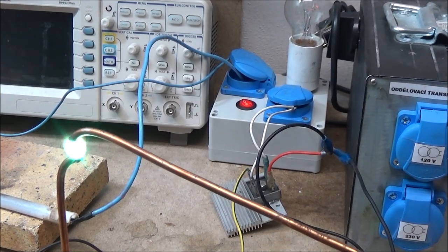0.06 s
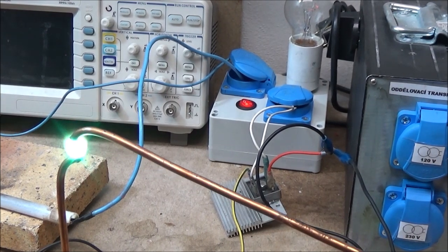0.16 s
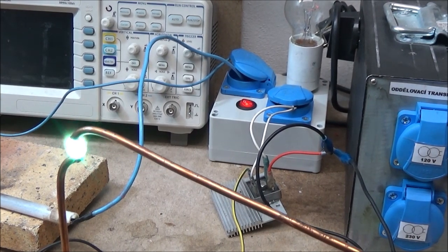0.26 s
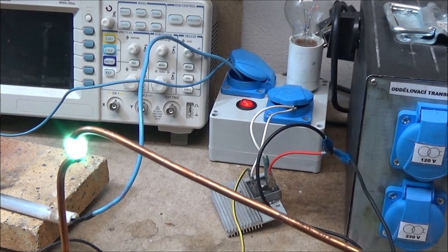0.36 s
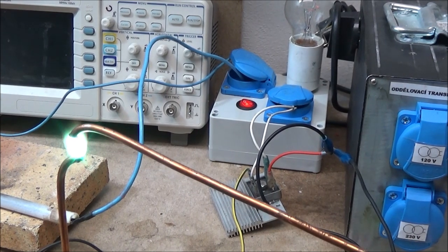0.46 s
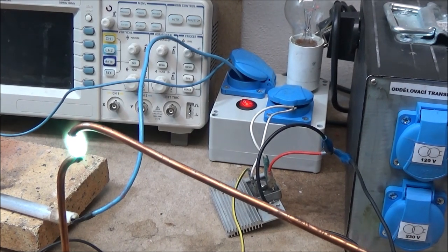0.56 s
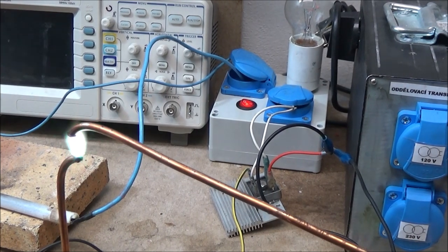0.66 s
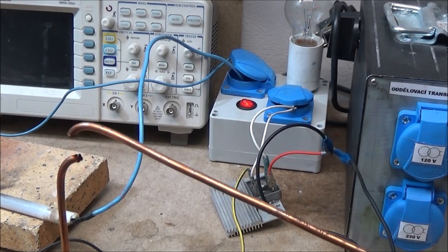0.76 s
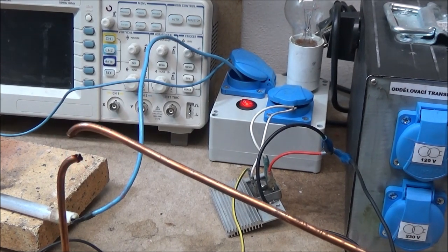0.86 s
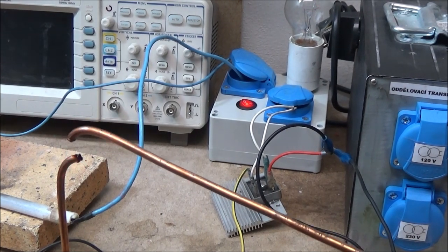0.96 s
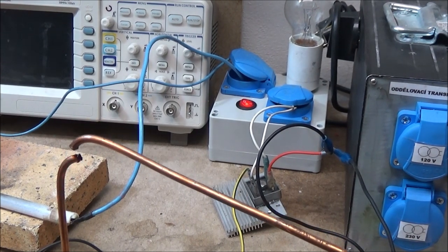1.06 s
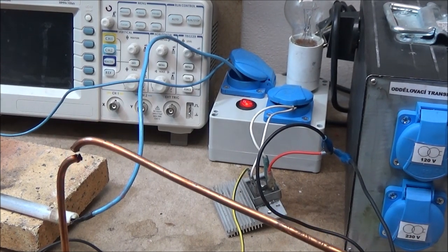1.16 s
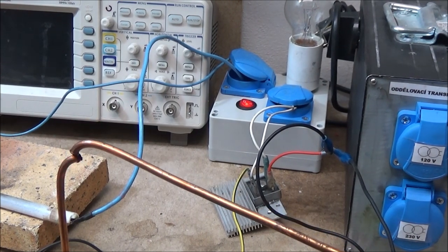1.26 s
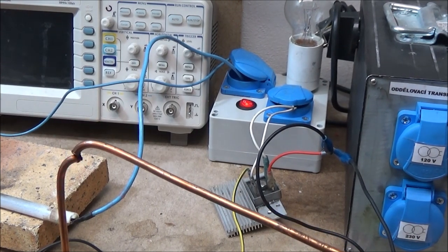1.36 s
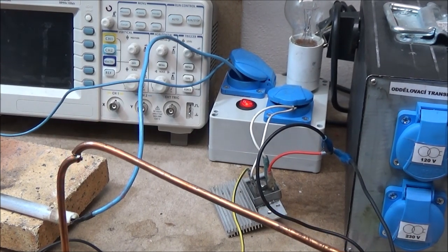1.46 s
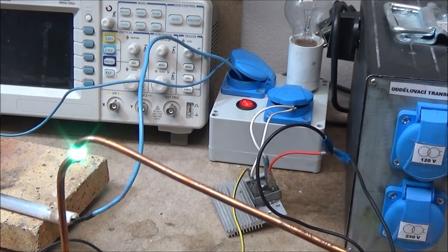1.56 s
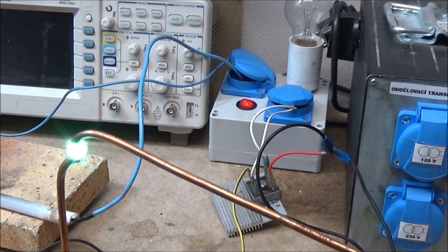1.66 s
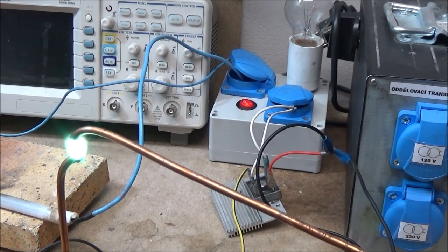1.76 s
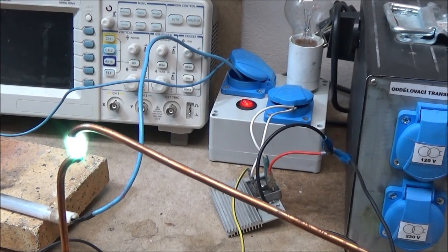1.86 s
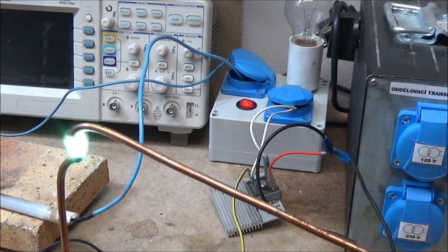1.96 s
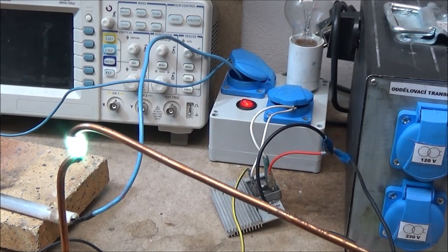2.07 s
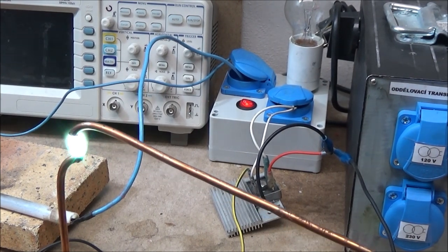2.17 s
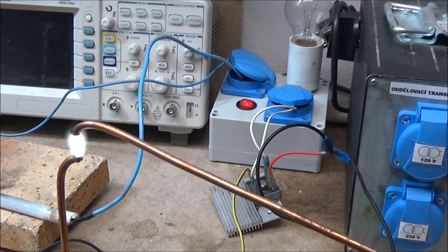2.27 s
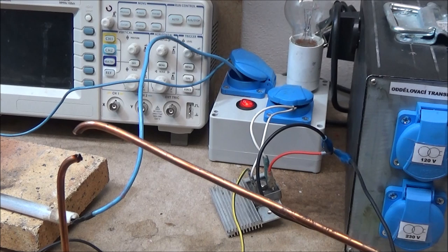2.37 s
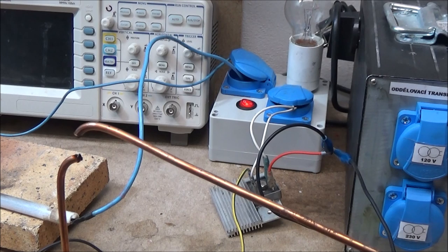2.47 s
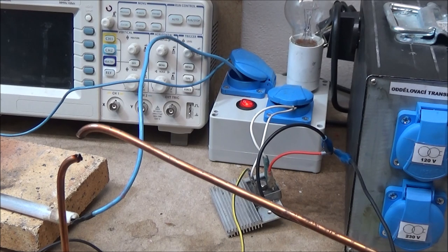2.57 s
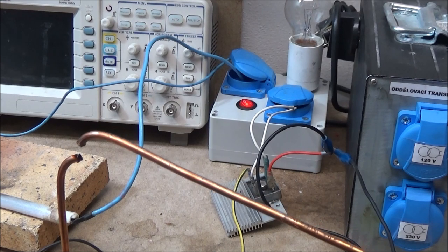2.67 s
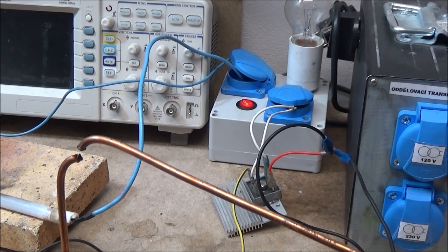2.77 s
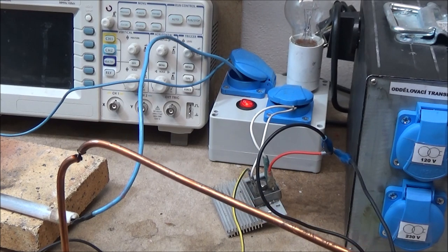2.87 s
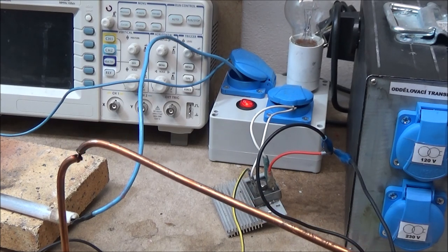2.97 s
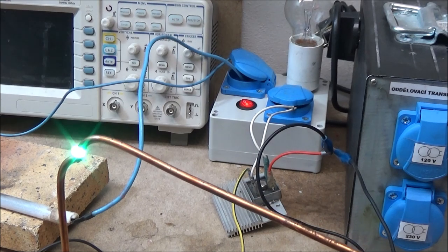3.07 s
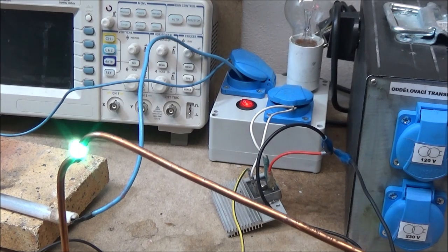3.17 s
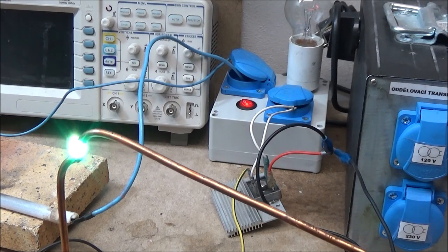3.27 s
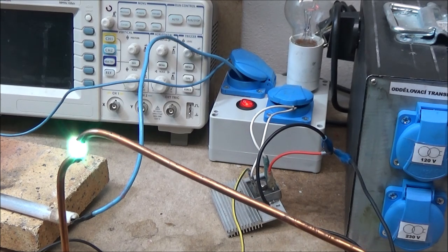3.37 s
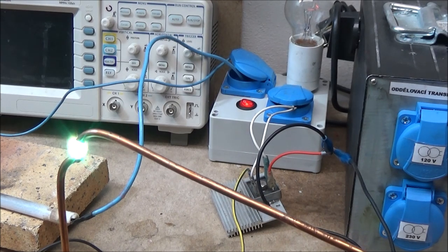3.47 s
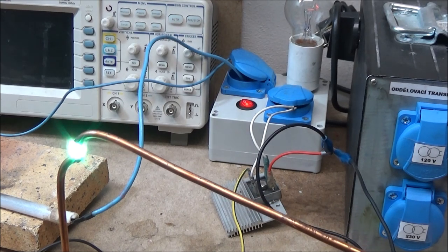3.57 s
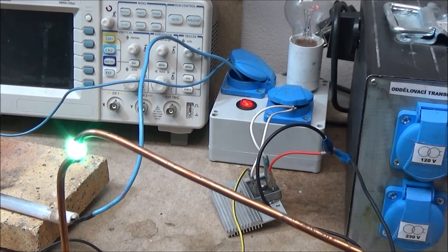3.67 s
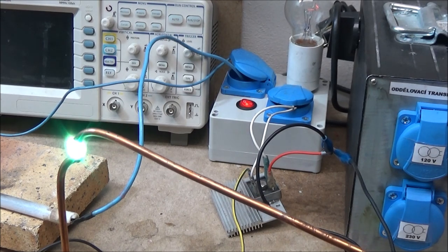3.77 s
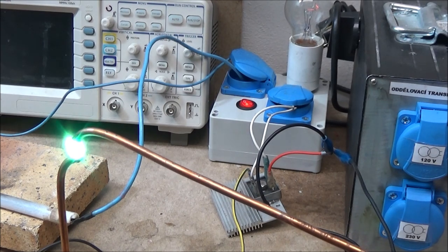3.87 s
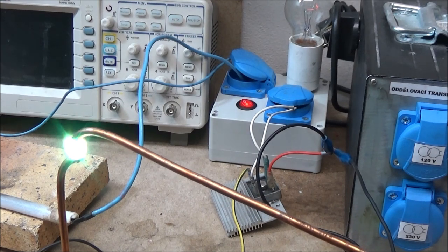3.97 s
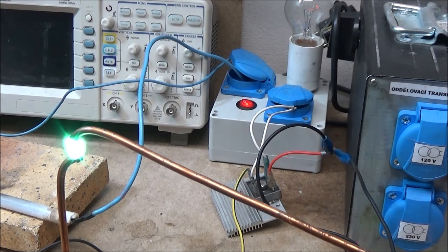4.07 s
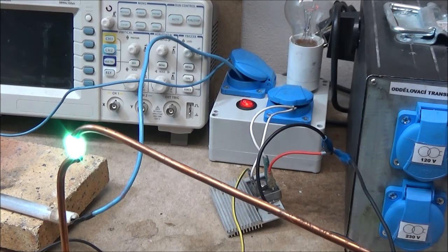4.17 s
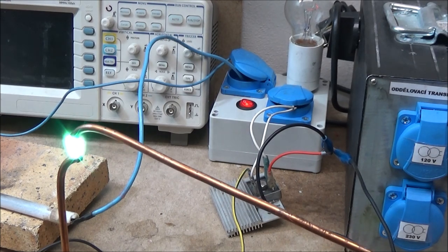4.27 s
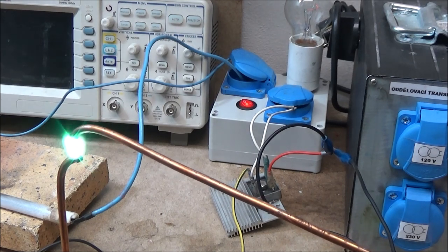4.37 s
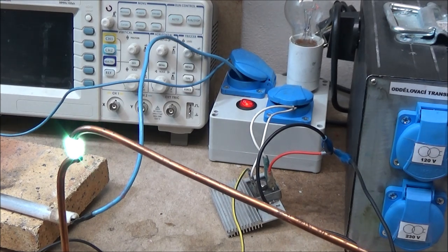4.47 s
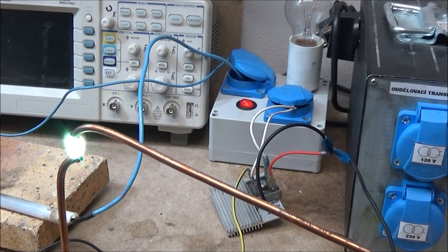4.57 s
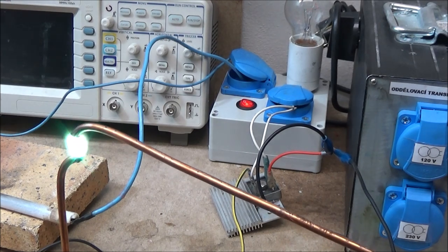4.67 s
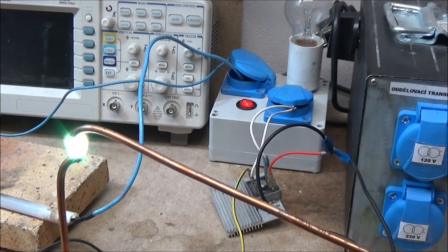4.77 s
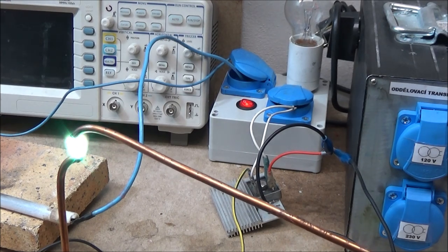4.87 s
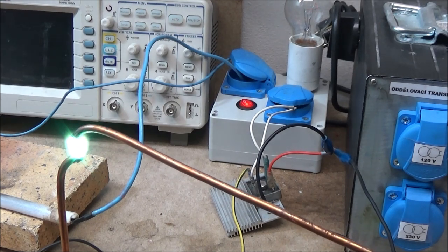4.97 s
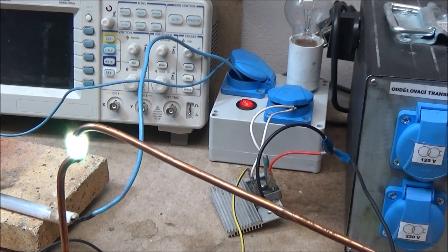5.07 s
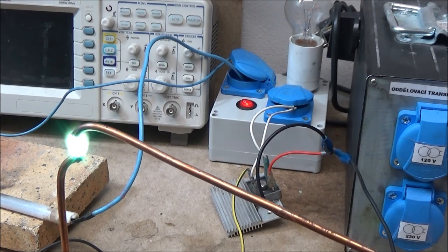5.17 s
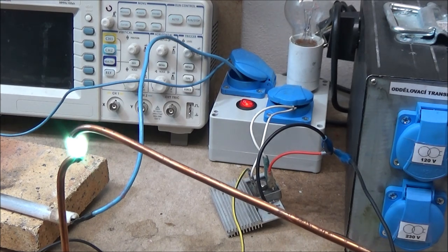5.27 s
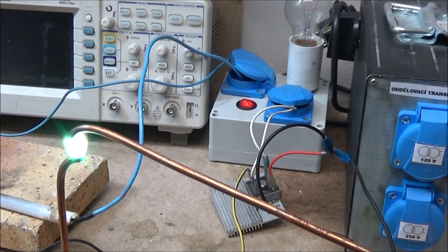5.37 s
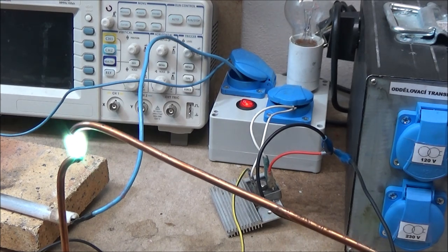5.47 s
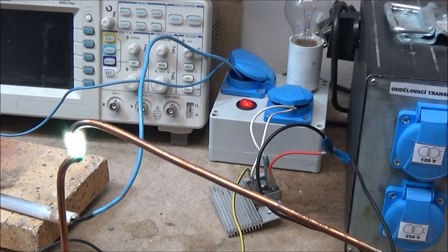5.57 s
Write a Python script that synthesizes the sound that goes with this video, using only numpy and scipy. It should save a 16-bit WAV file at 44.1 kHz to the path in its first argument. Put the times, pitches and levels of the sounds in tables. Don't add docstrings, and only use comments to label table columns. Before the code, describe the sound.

In a quiet workshop, a close stereo microphone pair hears an electric arc, slightly left, already burning: a harsh, bright, dense sizzle, roughened by a rapid mains-rate flutter, above a faint low transformer hum. Sharp snaps precede a sudden cutoff with a small pop at 0.73 s. The hum dies quickly, leaving soft air hiss and faint, quick camera-motor ticks, with a dull bump near 1.2. At 1.4 copper tubes clack and chatter; the sizzle catches unevenly, thin and bright at first, fuller by about 1.6, then breaks with a pop at 2.33. After another hush, brisk knocks from 2.9 to 3.0 strike it again; it catches, falters, and catches fully. This last burst runs on to the end at about 5.6, with brief flickers, a loud snap near 4.0, a weaker, more crackly sag from about 4.1 to 4.6, then recovery with scattered sharp snaps. Reflections are short and close.

```python
import sys
import numpy as np
from scipy import signal
from scipy.fft import rfft, irfft, next_fast_len
from scipy.io import wavfile
from scipy.ndimage import uniform_filter1d

SR = 44100
rng = np.random.default_rng(int(sys.argv[2]) if len(sys.argv) > 2 else 0)


def inscribe(sig):
    pcm = np.round(np.clip(np.atleast_2d(sig).T, -1, 1) * 32767)
    wavfile.write(sys.argv[1], SR, pcm.astype(np.int16))


def voltage_ratio(level):
    return 10 ** (np.asarray(level, float) / 20)


N = 247401
TIME = np.arange(N) / SR
MAINS_HZ = 50
MAINS_TURN = 2 * np.pi * MAINS_HZ * TIME
PAD = next_fast_len(N + SR)
HZ = np.maximum(np.arange(PAD // 2 + 1) * SR / PAD, 1)


def rms_one(x):
    return x / np.sqrt(np.mean(x ** 2) + 1e-20)


def in_time(rows):
    s, *columns = np.transpose(rows)
    return [np.interp(TIME, s, column) for column in columns]


def at_hz(points):
    hz, values = np.array(points)[:, 0], np.array(points)[:, 1]
    return np.interp(np.log(HZ), np.log(hz), values)


def shaped(x, response):
    return irfft(rfft(x, PAD) * response, PAD)[..., :N]


def butter(x, hz, kind, order=2):
    return signal.sosfilt(signal.butter(order, hz, kind, fs=SR, output="sos"), x)


def drift(rate_hz):
    r = np.exp(-2 * np.pi * rate_hz / SR)
    noise = rng.standard_normal(N + SR)
    return rms_one(signal.lfilter([1], [1, -2 * r, r * r], noise)[SR:])


def clicks(times, gains):
    out = np.zeros(N)
    places = np.round(np.asarray(times) * SR).astype(int)
    np.add.at(out, np.clip(places, 0, N - 1), gains)
    return out


def ring(x, hz, t60):
    r, w = np.exp(-np.log(1000) / (t60 * SR)), 2 * np.pi * hz / SR
    return signal.lfilter([0, np.sin(w)], [1, -2 * r * np.cos(w), r * r], x + 1e-18)


def step(s, width_s):
    return .5 + .5 * np.tanh((TIME - s) / width_s)


# from in seconds, to in seconds.
BURNS = [
    (-1, .7295),
    (1.452, 2.3262),
    (2.936, 9),
]
# time in seconds, strength in dB.
STRIKES = [
    [(1.45, -65), (1.458, -50), (1.518, -41.5), (1.542, -26.5), (1.56, -29), (1.572, -29), (1.6, -32.5)],
    [(2.93, -62), (2.953, -33), (2.964, -33.5), (2.978, -38.5), (2.985, -53), (3.007, -72), (3.017, -32),
     (3.06, -29.5), (3.08, -30.5)],
]
# time in seconds, strength in dB.
HOLDS = [
    [(0, -31.5), (.5, -30.5), (.72, -32), (.73, -40)],
    [(1.8, -32), (2.18, -30.5), (2.316, -33), (2.326, -42)],
    [(3.5, -29.5), (3.98, -30.5), (4.03, -33.5), (4.26, -38), (4.54, -37.5), (4.64, -31.5), (4.74, -31),
     (5.61, -31)],
]
# time in seconds, change in dB, half length in seconds, thinning in dB.
JUMPS = [
    (0.09, 3, 0.016, 4),
    (1.819, 5, 0.014, 3),
    (3.336, -2.5, 0.011, -2),
    (3.356, -2.5, 0.023, 9),
    (3.465, 1.5, 0.024, 1),
    (4.547, -3.5, 0.0085, -11),
    (4.586, -6, 0.041, -1),
    (5.565, -3.5, 0.02, -1),
]
# drawn out at in seconds, loss of body in dB, extra top in dB.
YOUNG = [
    (1.566, -12, 9),
    (3.03, -9, 8),
]
BODY_DB, TOP_DB = 1.5, -4
DRAW_OUT_S, TOP_SETTLES_S = .006, .039


def arc_controls():
    held_db, = in_time(sorted(row for span in STRIKES + HOLDS for row in span))
    jump_db, thin_db = np.zeros(N), np.zeros(N)
    for s, change_db, half_s, thinning_db in JUMPS:
        bump = np.clip(1 - abs(TIME - s) / half_s, 0, 1)
        jump_db += change_db * bump
        thin_db += thinning_db * bump
    body_db = BODY_DB - thin_db + .8 * drift(9.7)
    top_db = TOP_DB + thin_db + .5 * drift(4.8)
    for (lit_s, _), (drawn_s, loss_db, extra_db) in zip(BURNS[1:], YOUNG):
        struck = TIME > lit_s - .1
        body_db += loss_db * struck * (1 - step(drawn_s, DRAW_OUT_S))
        top_db += extra_db * struck * (1 - step(drawn_s, TOP_SETTLES_S))
    return held_db + jump_db, body_db, top_db


# frequency in Hz, density in dB per Hz.
SIZZLE = [(50, -42), (150, -26.5), (280, -19), (400, -12.5), (500, -19), (700, -15.5), (1100, -17),
          (2000, -9), (3500, -7), (5000, -1.3), (6500, -2.5), (8000, -1), (10500, 0.13), (13000, -9),
          (15600, -15)]
# centre in Hz, width in Hz, boost in dB.
CASINGS = [(1260, 210, 4.5), (1830, 22, 8), (2140, 36, 4), (3280, 32, -2), (3414, 38, 4), (9030, 220, 2)]


def sizzle():
    level_db, body_db, top_db = arc_controls()
    sizes = voltage_ratio(3.23 * np.minimum(rng.exponential(1, N), 5)) * rng.choice([-1, 1], N)
    discharges = sizes * (rng.random(N) < 9000 / SR)
    hiss = 1.09 * voltage_ratio(0.29 * np.clip(level_db + 28.5, -9, 3))
    sparks = discharges + hiss * rng.standard_normal(N)
    flicker_db = .8 * np.cos(2 * MAINS_TURN - 2.1) + 0.48 * drift(47) + 1.8 * drift(410)

    colour_db = at_hz(SIZZLE)
    for hz, width, boost_db in CASINGS:
        colour_db = colour_db + boost_db / (1 + (2 * (HZ - hz) / width) ** 2)
    below_2700 = 1 / (1 + (HZ / 2700) ** 6)
    below_5000 = 1 / (1 + (HZ / 5000) ** 6)
    above_11500 = 1 / (1 + (11500 / HZ) ** 12)
    ranges = np.array([below_2700, below_5000 - below_2700, 1 - below_5000 - above_11500, above_11500])
    bands = shaped(sparks * voltage_ratio(flicker_db), voltage_ratio(colour_db) * ranges)
    low, lower_middle, middle, top = rms_one(bands) / np.sqrt(3.6)
    raw = middle + voltage_ratio(0.41 * (body_db - BODY_DB)) * lower_middle + voltage_ratio(body_db) * low + voltage_ratio(top_db) * top

    lit = sum((TIME > a) & (TIME < b) for a, b in BURNS)
    gate = uniform_filter1d(lit * 1., size=40)
    return voltage_ratio(level_db - 1.74 - 0.16 * np.clip(level_db + 33.5, -9, 3)) * gate * raw


# time in seconds, peak in dB.
SNAPS = [(.0258, -70), (.6494, -24), (.6914, -8), (.6936, -18), (.7158, -23), (1.5425, -17), (1.55, -20),
         (3.0408, -10), (3.0465, -12), (3.9862, -6), (4.354, -24), (4.426, -18), (4.485, -17), (4.536, -19),
         (4.545, -21), (4.554, -12.5), (4.608, -17), (4.657, -12), (4.6954, -15), (4.9217, -11),
         (5.2739, -9), (5.442, -8), (5.4879, -24)]


def snaps():
    s, db = np.transpose(SNAPS)
    pulses = signal.lfilter([1, -1], [1, -.4, .3], clicks(s, voltage_ratio(db + 4)))
    return butter(pulses, 9300, "low", order=3)


# time in seconds, peak in dB.
POPS = [
    (0.73, -24.5),
    (2.3261, -25),
]


def pops():
    s, db = np.transpose(POPS)
    suction = -ring(clicks(s - .0003, voltage_ratio(db)), 1000, 0.0022)
    rebound = ring(clicks(s, voltage_ratio(db - 17.5)), 190, 0.018) + ring(clicks(s, voltage_ratio(db - 9)), 290, 0.012)
    return butter(suction + rebound, 90, "high")


# delay in milliseconds, signed reflection as a ratio.
ECHOES = [(0.323, 0.052), (0.395, -0.055), (0.577, -0.116), (0.601, 0.092), (0.701, 0.119), (0.747, -0.093),
          (0.902, 0.319), (1.033, 0.065), (1.12, -0.077), (1.143, 0.11), (1.362, -0.079), (1.685, 0.048),
          (1.723, 0.057), (1.801, 0.04), (2.004, 0.043), (2.199, -0.097), (2.214, 0.134), (2.288, -0.081),
          (2.436, -0.035), (2.495, -0.044), (2.65, -0.065), (2.71, 0.097), (2.796, -0.084), (2.862, 0.053),
          (2.947, -0.036), (3.101, -0.044), (3.17, 0.064), (3.572, -0.033), (4.76, -0.036), (5.662, -0.031)]


def bench_top(x):
    echoes = sum(g * np.exp(-2j * np.pi * HZ * ms / 1000) for ms, g in ECHOES)
    return shaped(x, 1 + 1.16 * echoes)


HUM_DB, HUM_IDLE_DB = -62.5, -84
OVERTONE_DB, OVERTONE_IDLE_DB = -70.5, -82
HUM_LIT_S, HUM_LEAD_S = -.45, .06
HUM_SWELL_S, HUM_DIES_S = .2, .039


def hum():
    load = 0
    starts = [HUM_LIT_S] + [row[0] - HUM_LEAD_S for row in YOUNG]
    for start_s, (_, out_s) in zip(starts, BURNS):
        swell = 1 - np.exp(-np.clip(TIME - start_s, 0, None) / HUM_SWELL_S)
        load = load + swell * np.exp(-np.clip(TIME - out_s, 0, None) / HUM_DIES_S)
    first = (voltage_ratio(HUM_IDLE_DB) + voltage_ratio(HUM_DB) * load ** 1.5) * voltage_ratio(1.3 * drift(5.0))
    second = (voltage_ratio(OVERTONE_IDLE_DB) + voltage_ratio(OVERTONE_DB) * load ** 0.58) * voltage_ratio(1.45 * drift(12))
    return np.sqrt(2) * (first * np.sin(2 * MAINS_TURN) + second * np.sin(4 * MAINS_TURN))


# frequency in Hz, level in dB, t60 in seconds, lag in seconds,
# change on a weak step in dB.
TICK = [(2660, -49, 0.011, 0.0009, -5), (2860, -50, 0.0083, .0008, -15), (3300, -56, 0.027, 0.0025, 0.5)]
TICK_FIRST_S, TICK_PERIOD_S = .0274, .04
TICK_LEAN_DB = 2.5


def camera_motor():
    s = np.arange(TICK_FIRST_S, N / SR, TICK_PERIOD_S)
    weak = np.arange(len(s)) % 2 == 0
    ticks = np.zeros(N)
    for hz, db, t60, lag_s, weak_db in TICK:
        chance_db = 1.2 * rng.normal(0, 1, len(s))
        ticks += ring(clicks(s + lag_s, voltage_ratio(db + weak * weak_db + chance_db)), hz, t60)
    return ticks * voltage_ratio(np.array([[TICK_LEAN_DB], [-TICK_LEAN_DB]]))


# time in seconds,
# level in dB, frequency in Hz, t60 in seconds.
THUMPS = [
    (0, -56, 57.3, 0.47),
    (0, -55, 123, 0.21),
    (1.161, -57.5, 254, 0.17),
    (1.455, -54, 120, 0.13),
    (2.976, -57.5, 120, .15),
]


def thumps():
    out = np.zeros(N)
    for s, db, hz, t60 in THUMPS:
        out += ring(ring(clicks([s], voltage_ratio(db)), hz, t60), hz, 0.09) * 500 / SR
    return out


# frequency in Hz, density in dB per Hz.
FLOOR = [(15, -32.5), (30, 0), (60, -0.5), (133, 2.5), (250, 1), (600, 0), (1000, -3), (1800, -5.5),
         (3600, -9.5), (8000, -14), (14700, -17), (16000, -19)]
# frequency in Hz, likeness from 0 to 1.
FLOOR_LIKENESS = [(70, 1), (180, 0.77), (550, 0.073), (1650, 0.044), (4970, 0.58), (10000, 0.99)]


def floor():
    alike = np.clip(at_hz(FLOOR_LIKENESS), 0, 1)
    noise = rng.standard_normal((2, N))
    mid, side = shaped(noise, voltage_ratio(at_hz(FLOOR)) * np.sqrt([1 + alike, 1 - alike]))
    return voltage_ratio(-57.25) * rms_one(np.array([mid + side, mid - side]))


# time in seconds, blow in dB, ring of the tip in relative dB, contact cutoff in Hz,
# tilt of the modes in dB per octave.
KNOCKS = [(1.412, -36.5, 5.5, 6000, 5), (1.418, -41.5, -4, 2000, -2), (1.456, -41, 2, 1500, -4.5),
          (1.465, -42, -9, 1400, -1), (1.486, -48, -19, 600, -6), (2.908, -38.5, 4.5, 6000, 6),
          (2.916, -38, 0, 2000, 3), (2.939, -37, -19, 1500, -3), (2.97, -44.5, -6, 2500, 12),
          (2.978, -40.5, 6.5, 2500, -1), (2.989, -41, -6, 2000, -6), (3.007, -46, -3, 1200, -5.5)]
# frequency in Hz, level in dB, t60 in seconds.
TUBE = [(273, -10, 0.13), (383, -13, 0.049), (566, -2.5, 0.061), (690, -7, 0.035), (860, -2.5, 0.037),
        (952, -0.5, 0.038), (1120, -2, 0.019), (1330, -11.5, 0.03), (1470, -16.5, 0.038),
        (1690, -7.5, 0.05), (1880, -10, .03), (2400, -26, .03)]
# frequency in Hz, level in dB, t60 in seconds.
TIP = [(2980, -2.5, 0.024), (3300, -16, 0.03), (5730, -16, .025), (5830, -16, 0.025), (6900, -20, .018)]


def knocks():
    out, t = np.zeros(N), TIME[:SR // 2]
    for s, db, tip_db, cut_hz, tilt_db in KNOCKS:
        blow = voltage_ratio(db) * (t == 0)
        touches = rng.choice([-1, 1], len(t)) * (rng.random(len(t)) < 1600 / SR)
        chatter = voltage_ratio(db + 0.5) * touches * np.exp(-t / 0.01)
        soft = butter(blow + chatter, cut_hz, "low", order=1)
        body, tip = np.zeros(len(t)), np.zeros(len(t))
        for hz, mode_db, t60 in TUBE:
            strength = voltage_ratio(mode_db - 6.5 + tilt_db * np.log2(hz / 800)) * rng.choice([-1, 1])
            body += strength * ring(soft, hz, t60)
        for hz, mode_db, t60 in TIP:
            strength = voltage_ratio(mode_db + tip_db - 1 + rng.normal(0, 0.89))
            tip += strength * ring(blow + 0.23 * chatter, hz, t60)
        crack = voltage_ratio(db + tip_db - 6.0) * rng.standard_normal(len(t)) * np.exp(-t / 0.0057)
        at = round(s * SR)
        out[at:at + len(t)] += body + tip + butter(crack, 6000, "low")
    return butter(out, 150, "high")


# frequency in Hz, side against mid in dB.
ARC_SIDE = [(60, -30), (150, -21), (380, -18), (950, -11), (2380, -17), (5980, -11), (9000, -13),
            (15000, -11)]
ROOM_T60_S, ROOM_DB = 0.33, -12


def room(x):
    t = TIME[:SR // 2]
    tails = rng.standard_normal((2, len(t))) * voltage_ratio(-60 * t / ROOM_T60_S) * (t > .004)
    tails = tails * np.exp(-t / 0.028) + butter(tails, 6100, "low", order=1)
    energy = np.sum(tails ** 2, axis=1, keepdims=True)
    mid, side = rfft(tails / np.sqrt(energy), PAD)
    return shaped(x, np.array([voltage_ratio(ROOM_DB) * mid, voltage_ratio(at_hz(ARC_SIDE) - 3.0) * side]))


# frequency in Hz, left against right in dB.
ARC_BALANCE = [(150, 0), (380, .1), (950, 1.4), (2380, .6), (5980, 1.2), (9000, 1), (15000, .6)]


def scene():
    arc = sizzle() + snaps() + pops()
    tubes = knocks()
    wet, side = room(arc + tubes)
    lean_db = at_hz(ARC_BALANCE) / 2
    direct = shaped(bench_top(arc) + tubes, voltage_ratio(np.array([lean_db, -lean_db])))
    bench = direct + wet + side * [[1], [-1]]
    return bench + hum() + camera_motor() + thumps() + floor()


def band_limit(x):
    return signal.sosfilt(signal.butter(12, 15700, fs=SR, output="sos"), x)


def record(dry):
    top_cut = signal.ellip(10, .2, 70, 15700, fs=SR, output="sos")
    mix = signal.sosfilt(top_cut, dry)
    return band_limit(mix)


dry = scene()
out = record(dry)
inscribe(out)
```